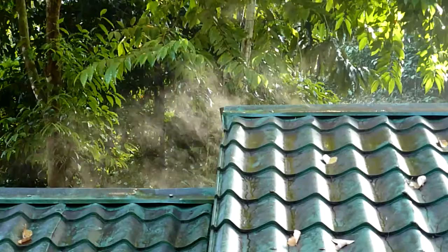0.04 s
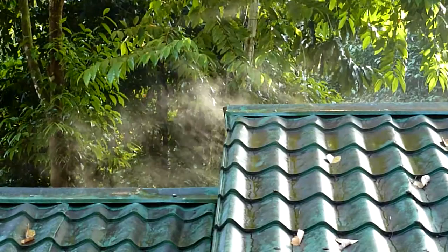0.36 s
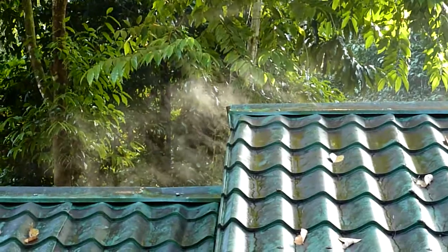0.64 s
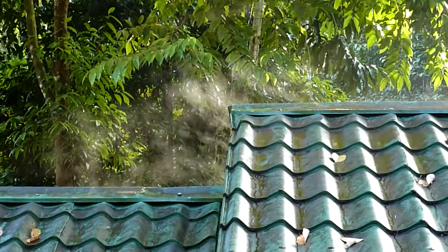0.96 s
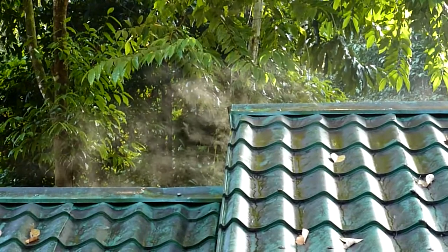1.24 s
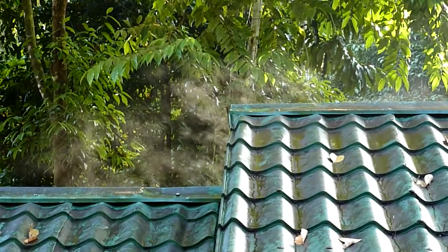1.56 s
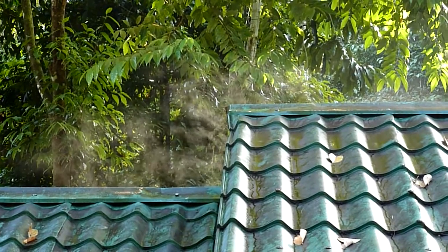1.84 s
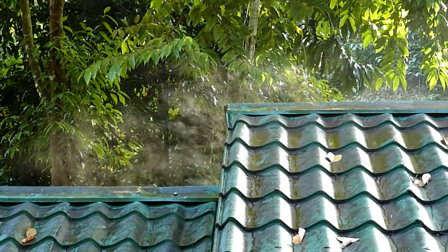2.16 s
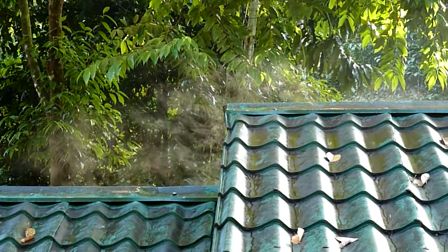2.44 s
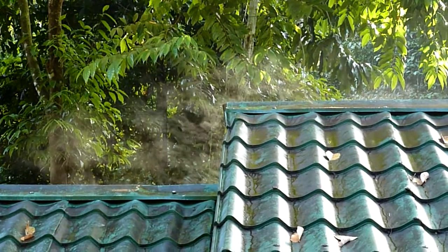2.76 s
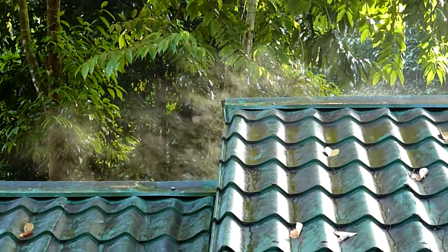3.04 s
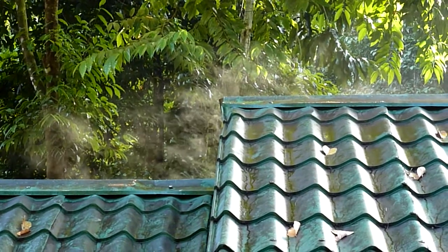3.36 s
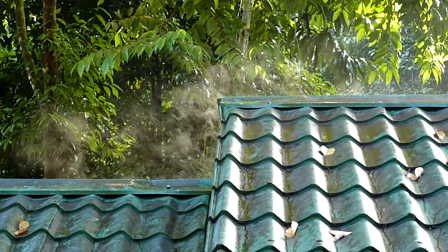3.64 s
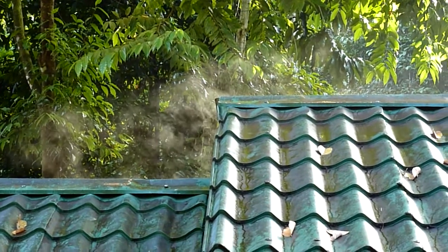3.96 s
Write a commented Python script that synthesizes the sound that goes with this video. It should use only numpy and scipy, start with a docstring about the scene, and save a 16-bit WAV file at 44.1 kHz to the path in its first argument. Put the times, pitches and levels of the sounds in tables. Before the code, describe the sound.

Quiet outdoor air hisses evenly among trees, with tiny drips and a machine humming low. After a low microphone pop comes one close, ringing clack, followed by scattered soft thuds, short metallic squeaks and chinks, and faint brushing.

```python
"""Sheltered spot among tropical trees

By a tiled roof, a soft steady wash of air and light dripping lie over a machine's low hum.
Something clacks shut nearby: a quick run of contacts rings a panel. Dull bumps follow, faint
swishes pass, and a piece of metal squeaks and chinks as short slips ring its modes.
The microphone comes on with a low pop just after the start."""
import sys
import numpy as np
from scipy import signal
from scipy.fft import rfft, irfft, next_fast_len
from scipy.io import wavfile
from scipy.ndimage import map_coordinates

SR = 44100
rng = np.random.default_rng(int(sys.argv[2]) if len(sys.argv) > 2 else 0)


def inscribe(sig):
    """Save sig as 16-bit PCM at rate SR to the path in sys.argv[1].

    A 1-D sig is mono; a 2-D sig holds one channel per row.
    Samples are clipped to [-1, 1] before scaling.
    """
    pcm = np.round(np.clip(np.atleast_2d(sig).T, -1, 1) * 32767)
    wavfile.write(sys.argv[1], SR, pcm.astype(np.int16))


N = 176400
EVENT_SAMPLES = SR // 2


def amp(db):
    return 10 ** (np.asarray(db) / 20)


def unit_rms(x):
    return x / np.sqrt(np.mean(x ** 2) + 1e-20)


def along(points, hz):
    """Interpolate (freq_hz, value) points on a log axis."""
    freq_hz, values = np.transpose(points)
    return np.interp(np.log(hz + 1), np.log(freq_hz + 1), values)


def wobble(rate_hz):
    """Smooth random curve with knots at rate_hz."""
    return map_coordinates(rng.standard_normal(N // 100), [np.arange(N) * rate_hz / SR], mode="wrap")


def filtered(x, response):
    """Apply response(hz) to x."""
    n = x.shape[-1]
    n_fft = next_fast_len(n + SR // 4)
    return irfft(rfft(x, n_fft) * response(np.fft.rfftfreq(n_fft, 1 / SR)), n_fft)[..., :n]


def coloured(x, response):
    """Filter two unrelated signals as mid and side at unit power gain; return left and right."""
    # freq_hz, side_minus_mid_db
    stereo_width = [(100, -25.5), (500, -24.5), (1000, -28.5), (2000, -14), (4000, -7), (6000, -3.5),
                    (8000, -1.5), (13000, 1)]

    def shape(hz):
        gain = response(hz) * np.array([np.ones_like(hz), amp(along(stereo_width, hz))])
        return gain / np.sqrt(2 * np.mean(abs(gain) ** 2))
    mid, side = filtered(x, shape)
    return np.array([mid + side, mid - side])


def curve(points):
    """Response through (freq_hz, gain_db) points."""
    return lambda hz: amp(along(points, hz))


def ringing(modes, hz, order=1):
    """Response of a resonant body; order 2 deepens the valleys between modes."""
    return sum(amp(db) * (1j * hz * width_hz / (mode_hz ** 2 - hz ** 2 + 1j * hz * width_hz)) ** order
               for mode_hz, width_hz, db in modes)


def add(track, start_s, x):
    part = track[:, max(round(start_s * SR), 0):][:, :x.shape[1]]
    part += x[:, :part.shape[1]]


def stroke(length_s):
    """Noise that rises quickly, holds and lets go."""
    progress = np.arange(EVENT_SAMPLES) / SR / length_s
    envelope = (1 - np.exp(-5 * progress)) * np.exp(-progress ** 3 / 2)
    return rng.standard_normal((2, EVENT_SAMPLES)) * envelope


def blend(a, b, b_db):
    """Mix b into a, keeping the power."""
    return (a + amp(b_db) * b) / np.hypot(1, amp(b_db))


def echo(x):
    """Diffuse tail from the surroundings; treble dies first."""
    # freq_hz, t60_s
    decay = [(200, 0.85), (800, 0.55), (3000, 0.55), (12000, 0.26)]
    hz, t, spectrum = signal.stft(rng.standard_normal((2, EVENT_SAMPLES)), SR, nperseg=256)
    fade = amp(-60 * t / along(decay, hz)[:, None])
    _, tail = signal.istft(spectrum * fade, SR, nperseg=256)
    return signal.fftconvolve(x, tail / np.linalg.norm(tail[0]), axes=1)[:, :x.shape[1]]


def echoed(x, wet_db):
    return x + amp(wet_db) * echo(x)


def air():
    """Even wash of noise from the surroundings."""
    # freq_hz, relative_density_db
    spectrum = [(25, -21), (42, -21), (55, -3), (72, -45), (100, 2.5), (140, -7.5), (200, -4), (400, -6.5),
                (700, -6), (1000, -9.5), (1450, -10.5), (2000, -15), (2900, -16.5), (4400, -22),
                (5100, -18.5), (5600, -22), (6150, -19), (6800, -26.5), (7550, -24.5), (8400, -29.5),
                (9500, -25.5), (11000, -34), (12000, -32.5), (14200, -39), (15000, -43)]
    return amp(-43) * coloured(rng.standard_normal((2, N)), curve(spectrum))


def machine_hum():
    """Machine tones wavering in strength and phase."""
    # pitch_hz, rms_db, waver_ratio
    tones = [(59.5, -66, .3), (88, -67, .15), (102.6, -53, .2), (122.7, -59, .3), (147.5, -64, .4),
             (194, -58, .5), (308, -59, .4), (388, -62, .4), (438.3, -54.3, .35), (634, -61.5, .3),
             (780, -63, .3), (1606, -64.5, .3), (2679, -69, .4)]
    t = np.arange(N) / SR
    out = np.zeros(N)
    for hz, rms_db, waver in tones:
        phase = 2 * np.pi * (hz * t + rng.random())
        in_phase = (1 + waver * wobble(7.855)) * np.sin(phase)
        quadrature = waver * wobble(8) * np.cos(phase)
        out += amp(rms_db) * unit_rms(in_phase + quadrature)
    return out


def drips():
    """Many tiny far drops, each a few cycles long, blurred by echo."""
    drops_per_s, centre_hz, span_octaves, ring_cycles, spread_db = 110, 2160, 3, 6.1, 15
    out, t = np.zeros((2, N)), np.arange(SR // 50) / SR
    for when, pitch, softness, pan in rng.random((int(drops_per_s * N / SR), 4)):
        hz = centre_hz * 2 ** (span_octaves * (pitch - .5))
        drop = amp(-spread_db * softness) * np.sin(2 * np.pi * hz * t) * np.exp(-2 * hz * t / ring_cycles)
        add(out, when * N / SR, np.outer([.5 + pan, 1.5 - pan], drop))
    return amp(-60) * unit_rms(echoed(out, wet_db=-14))


def swishes():
    """Faint brushes of high noise."""
    # start_s, length_s, level_db
    brushes = [(0.922, 0.08, -58), (2.528, 0.048, -50.5), (2.8, 0.048, -54), (3.12, 0.039, -49),
               (3.61, .03, -62), (3.96, .04, -57)]
    # freq_hz, gain_db
    spectrum = [(500, -13), (3000, 3), (6000, 2), (10000, 3.5), (13000, -1), (15000, -7)]
    out = np.zeros((2, N))
    for start_s, length_s, level_db in brushes:
        add(out, start_s, amp(level_db) * stroke(length_s))
    return coloured(echoed(out, wet_db=-7), curve(spectrum))


def bumps():
    """Soft thuds with no ring, each a broad hump of noise around its pitch."""
    # start_s, length_s, level_db, pitch_hz
    thuds = [(0.578, 0.011, -33, 346), (0.586, 0.022, -40, 680), (0.603, 0.0064, -34, 440),
             (2.177, 0.042, -42.5, 410), (2.644, 0.038, -39, 275), (3.364, 0.048, -44, 200)]
    # pitch_ratio, gain_db
    hump_shape = [(.25, -22), (.55, -1), (1, -4.5), (1.7, -9), (3, -32), (8, -24), (25, -62)]
    out = np.zeros((2, N))
    for start_s, length_s, level_db, pitch_hz in thuds:
        hump = curve([(pitch_hz * ratio, gain_db) for ratio, gain_db in hump_shape])
        add(out, start_s, amp(level_db) * coloured(echoed(stroke(length_s), wet_db=-16.5), hump))
    return out


def metal_squeaks():
    """Short gritty slips scrape and ring one piece of metal, each with its own lead tone."""
    # start_s, length_s, level_db, tilt_db_per_octave, lead_hz, lead_over_body_db, scrape_over_ring_db
    slips = [(0.728, 0.012, -38.5, 0, 3530, 6, -18), (0.737, 0.01, -43, 6.5, 5650, 0, -7),
             (1.107, 0.028, -44.5, 2, 3660, 5, -14), (1.183, .02, -41, -9, 4900, -4, -12),
             (1.206, 0.0048, -28.5, -2.5, 4140, -1, -7), (1.215, 0.0092, -32, -4, 4060, -4, -11),
             (1.231, 0.0084, -40, -6, 3120, 0, -11), (1.246, .011, -38, 1.5, 3540, -3, -9),
             (1.316, 0.03, -42.5, -5.5, 3600, -9, -4), (1.335, 0.02, -45.5, -5, 2380, 7, -12),
             (2.048, 0.027, -43.5, 4, 3900, -5.5, -8), (2.074, 0.034, -43.5, 5, 4030, -3, -7),
             (3.399, 0.022, -43, 4, 4900, -7, -6), (3.42, 0.038, -45.5, -4, 2350, 0, -2),
             (3.481, .007, -50, -2, 4930, 0, -8), (3.528, .016, -46, 4, 4960, -4, -14),
             (3.727, 0.063, -51.5, 8, 12200, -8, -9)]
    # mode_hz, width_hz, gain_db
    metal_modes = [(2066, 67, 0.5), (2450, 150, -8), (3010, 150, 5.5), (3570, 140, 3.5), (4050, 54, -6),
                   (4224, 90, -1.5), (4970, 83, 1), (5700, 250, -4), (6000, 58, -3), (6400, 130, -1),
                   (7510, 140, -8), (8100, 81, -18), (8500, 110, -19), (9220, 110, -6), (9530, 170, -14),
                   (9800, 100, -12), (11820, 110, -10), (13050, 250, -17), (13800, 300, -19)]
    # freq_hz, gain_db
    scrape_spectrum = [(800, -30), (2000, -2), (3300, 3.5), (4300, -15.5), (6500, -6.5), (9500, -11.5),
                       (15000, -27)]
    grit_db, grain_samples, scatter_db, lead_width_hz = .5, 30, 4.5, 120
    out = np.zeros((2, N))
    for start_s, length_s, level_db, tilt_db_per_octave, lead_hz, lead_db, scrape_db in slips:
        grains = np.repeat(rng.standard_normal(EVENT_SAMPLES), grain_samples)[:EVENT_SAMPLES]
        grit = unit_rms(amp(grit_db * grains))
        rub = stroke(length_s) * grit
        tilt = lambda hz: amp(tilt_db_per_octave * np.log2(hz / 4000 + 1e-3))
        # each slip favours other modes
        modes = [(hz, width_hz, db + scatter_db * rng.standard_normal())
                 for hz, width_hz, db in metal_modes]
        body = coloured(echoed(rub, wet_db=-2.5), lambda hz: ringing(modes, hz, order=2) * tilt(hz))
        lead = coloured(echoed(stroke(length_s) * grit, wet_db=-10),
                        lambda hz: ringing([(lead_hz, lead_width_hz, 0)], hz))
        scrape = coloured(echoed(stroke(length_s) * grit, wet_db=-8),
                          lambda hz: curve(scrape_spectrum)(hz) * tilt(hz))
        ring = blend(body, lead, lead_db)
        add(out, start_s, amp(level_db) * blend(ring, scrape, scrape_db))
    return out


def clack():
    """A quick run of contacts rings a panel; the hard ones also crack."""
    # start_s, level_db, decay_s, hardness_db
    contacts = [(0.2795, -34.5, 0.0059, 5.5), (.2850, -26.5, 0.0068, 0), (.2882, -22, 0.0034, -2),
                (0.2913, -23, 0.0035, 0), (.297, -36, 0.0043, 2), (0.3065, -29.5, 0.005, -4.5),
                (0.3275, -22.5, 0.0042, -13)]
    # mode_hz, width_hz, gain_db
    panel_modes = [(320, 23, 4.5), (725, 49, 3), (774, 54, 9), (1000, 30, -5), (1340, 76, 6),
                   (1630, 100, 3), (2192, 57, 14.5), (2490, 67, 2), (3000, 78, 0), (3880, 100, -3)]
    # freq_hz, gain_db
    crack_spectrum = [(100, -26), (220, -14), (310, 8.5), (520, -17), (760, 3), (1150, -10), (1700, -6),
                      (2700, -1), (3300, -6), (4500, -17), (7500, -28), (10000, -36), (15000, -39)]
    # freq_hz, gain_db
    tail_spectrum = [(120, -25), (240, -18), (320, 7.5), (520, -19), (735, 9.5), (900, -1), (1200, 1.5),
                     (2200, -4), (4500, -11), (7500, -16), (10000, -18.5), (15000, -30)]
    soft_cutoff_hz = 1000  # soft contacts ring mainly the modes below
    force, hard_force = np.zeros((2, N)), np.zeros((2, N))
    t = np.arange(EVENT_SAMPLES) / SR
    for start_s, level_db, decay_s, hardness_db in contacts:
        contact = amp(level_db) * np.exp(-t / decay_s) * rng.standard_normal((2, EVENT_SAMPLES))
        add(force, start_s, contact)
        add(hard_force, start_s, amp(hardness_db) * contact)
    soft_force = filtered(force - hard_force, lambda hz: 1 / (1 + (hz / soft_cutoff_hz) ** 6))
    panel = amp(-1.5) * coloured(hard_force + soft_force, lambda hz: ringing(panel_modes, hz))
    crack = amp(-2) * coloured(hard_force, curve(crack_spectrum))
    tail = coloured(echo(hard_force), curve(tail_spectrum))
    return panel + crack + tail


def scene():
    """Small events over a steady background, treble leaning left."""
    # freq_hz, left_minus_right_db
    balance = [(1000, 0), (3000, .1), (7000, 1.7), (9500, 2), (13000, 1)]
    events = clack() + metal_squeaks() + bumps() + swishes()
    background = air() + machine_hum() + drips()
    return filtered(background + events, lambda hz: amp(np.outer([.5, -.5], along(balance, hz))))


def record(dry):
    """Silence until the microphone pops on with a settling offset; treble notch and band limit."""
    on_s, pop_db, pop_decay_s, pop_crossing_s = .17, -27, .086, .1
    notch_hz, notch_width_hz, notch_depth, top_hz = 7900, 90, .72, 15100
    since_on_s = np.maximum(np.arange(N) / SR - on_s, 0)
    pop = -amp(pop_db) * np.exp(-since_on_s / pop_decay_s) * (1 - since_on_s / pop_crossing_s)
    notch = lambda hz: 1 - notch_depth * np.exp(-((hz - notch_hz) / notch_width_hz) ** 2)
    live = (filtered(dry, notch) + pop) * (since_on_s > 0)
    return filtered(live, lambda hz: np.clip((top_hz - hz) / 300 + .5, 0, 1))


dry = scene()
out = record(dry)
inscribe(out)
```